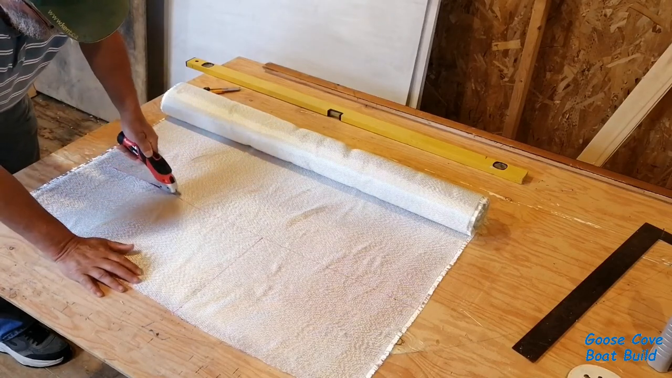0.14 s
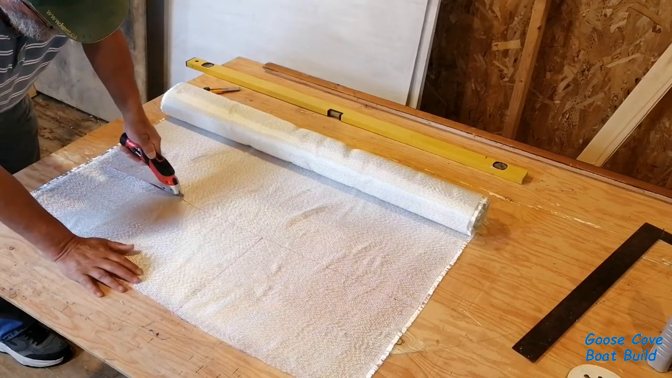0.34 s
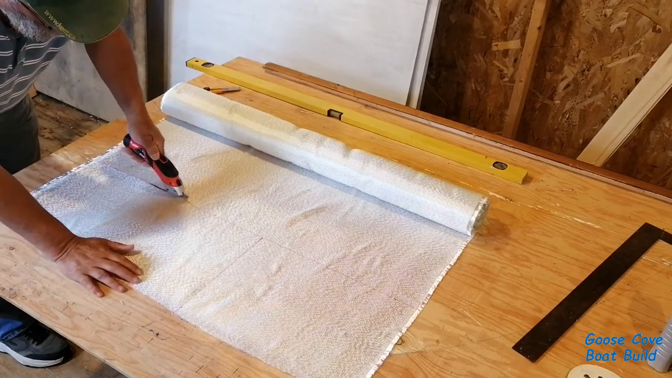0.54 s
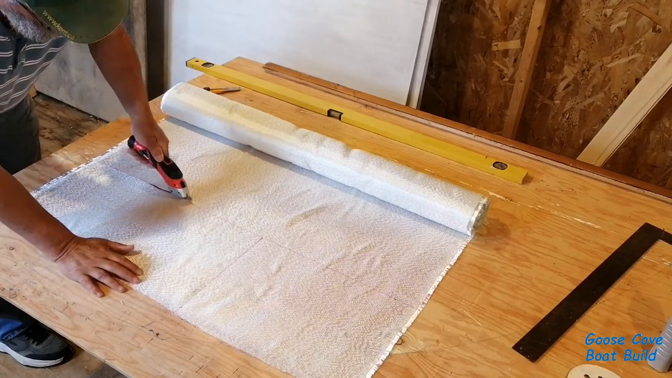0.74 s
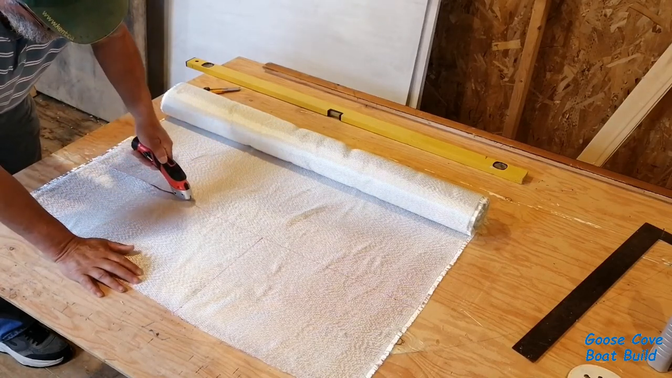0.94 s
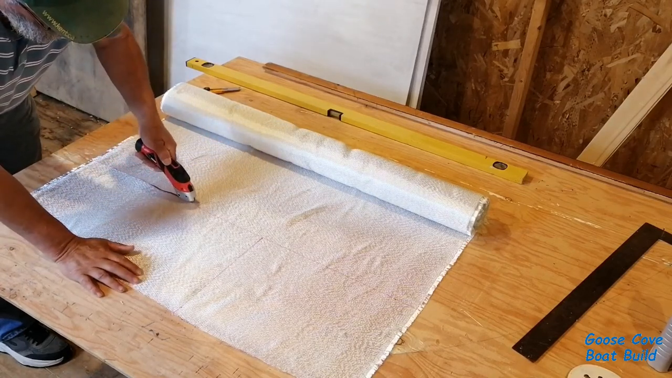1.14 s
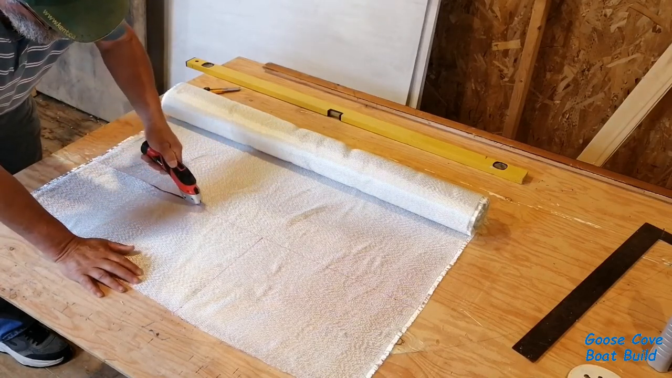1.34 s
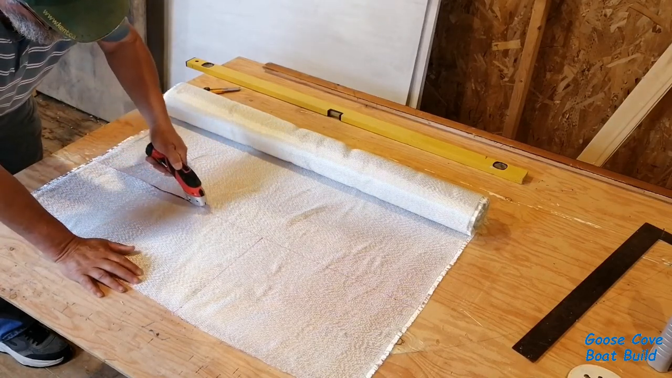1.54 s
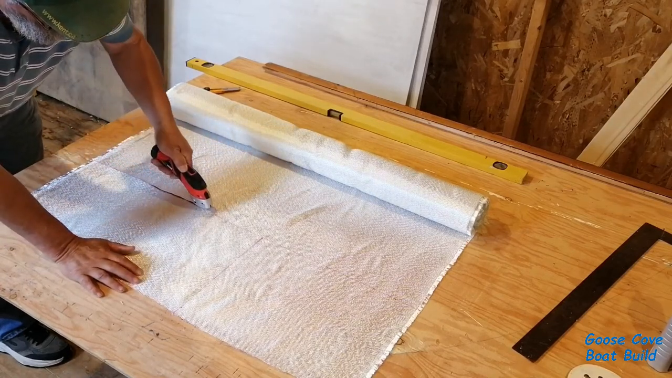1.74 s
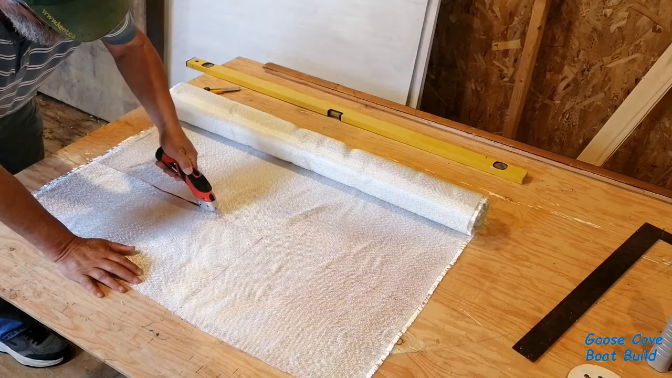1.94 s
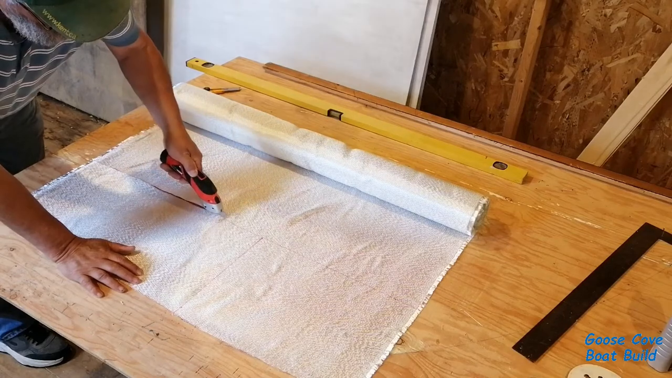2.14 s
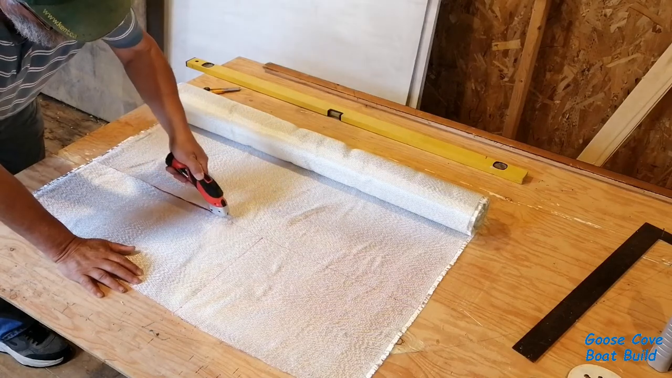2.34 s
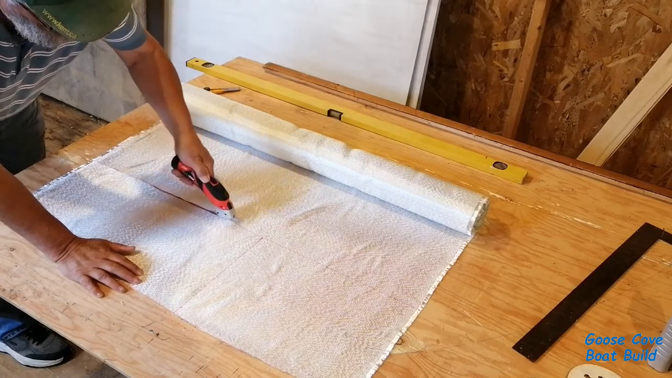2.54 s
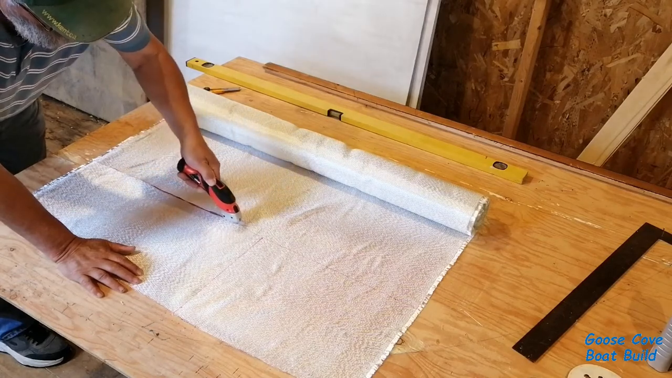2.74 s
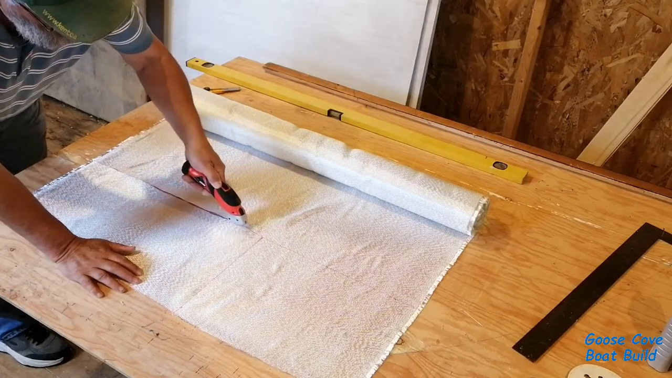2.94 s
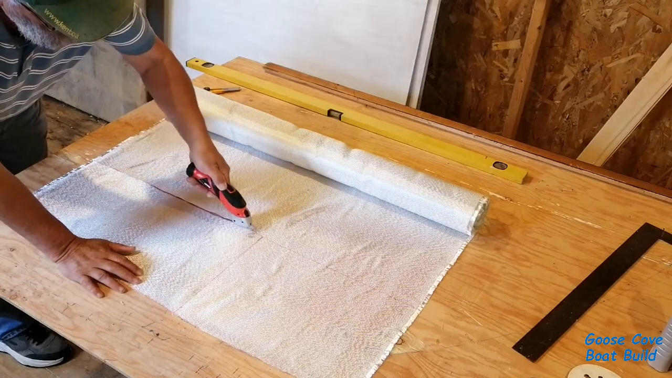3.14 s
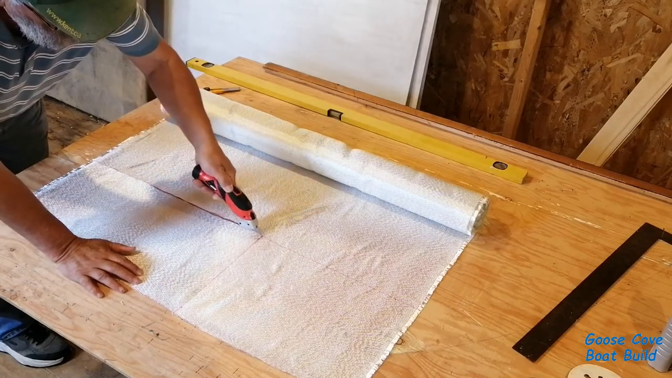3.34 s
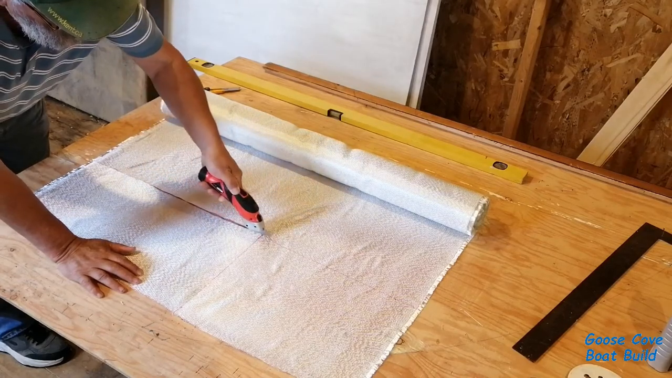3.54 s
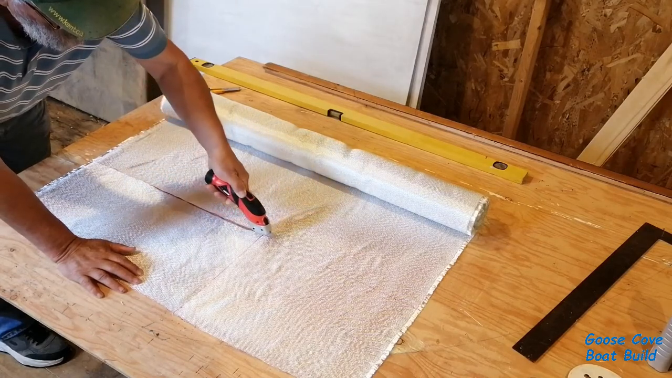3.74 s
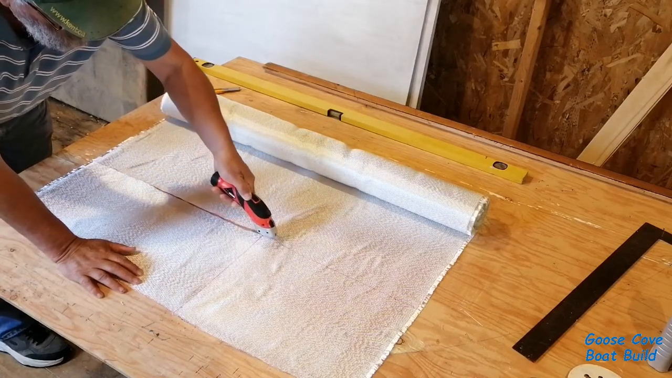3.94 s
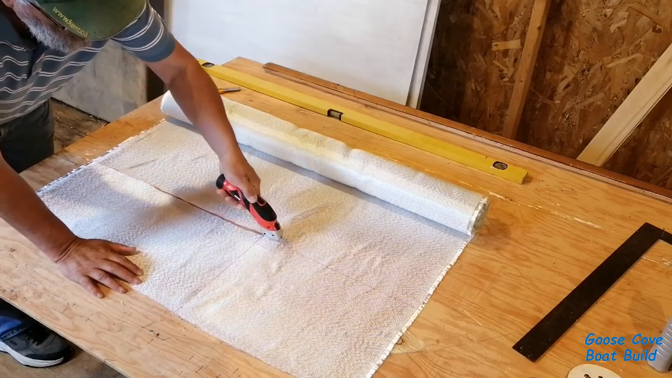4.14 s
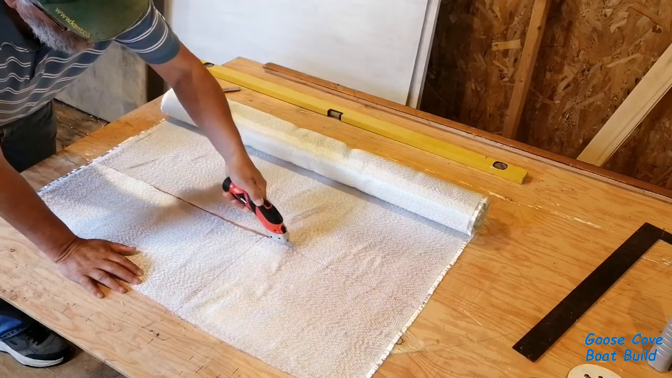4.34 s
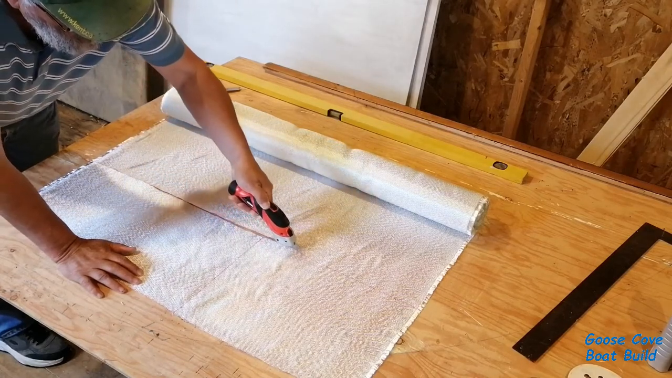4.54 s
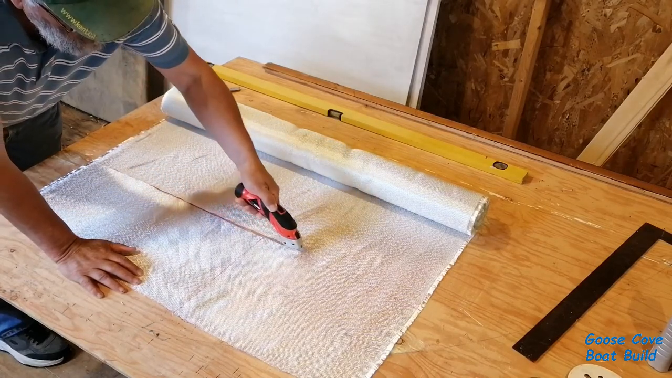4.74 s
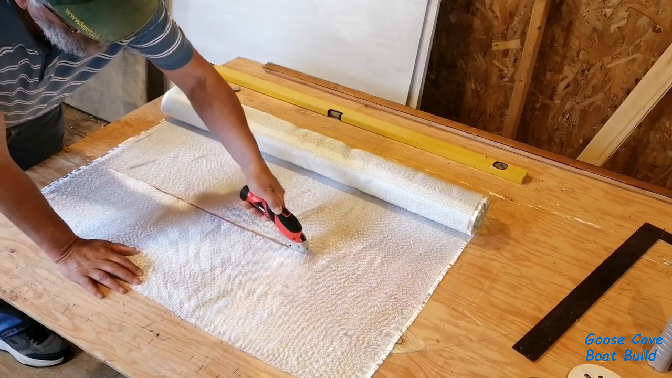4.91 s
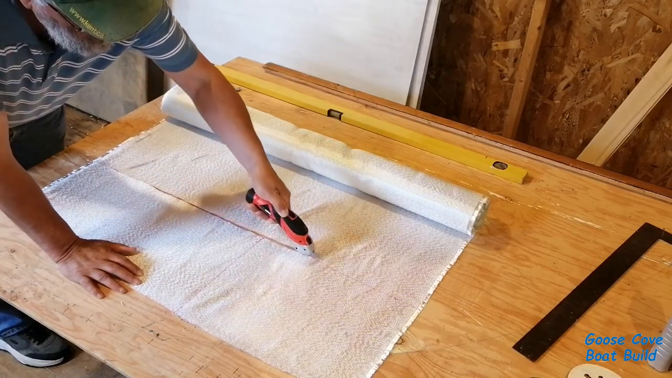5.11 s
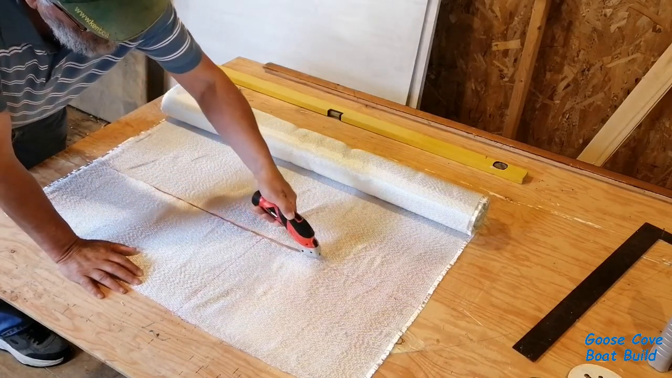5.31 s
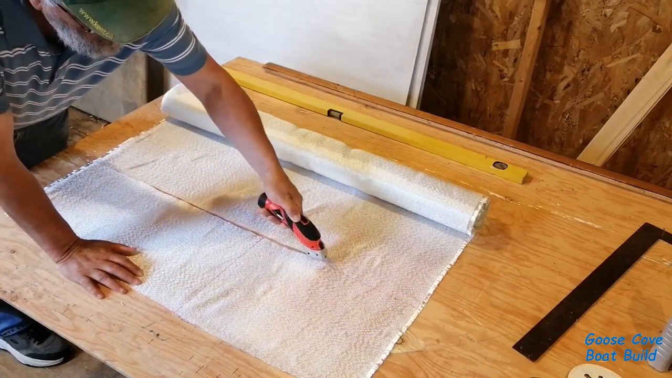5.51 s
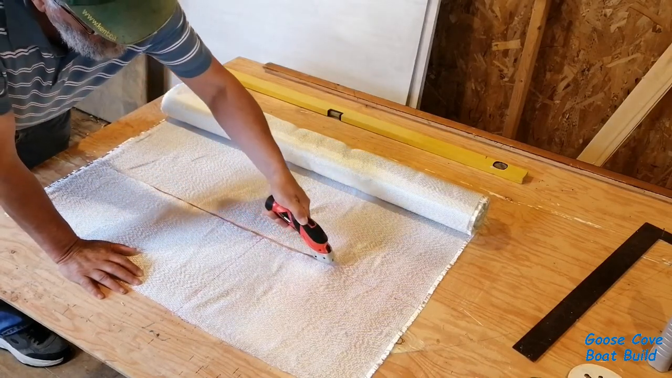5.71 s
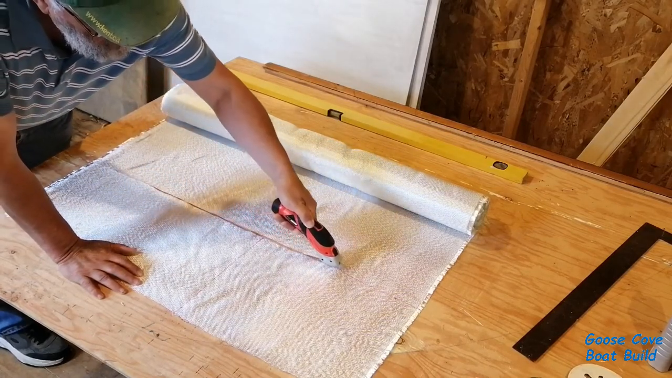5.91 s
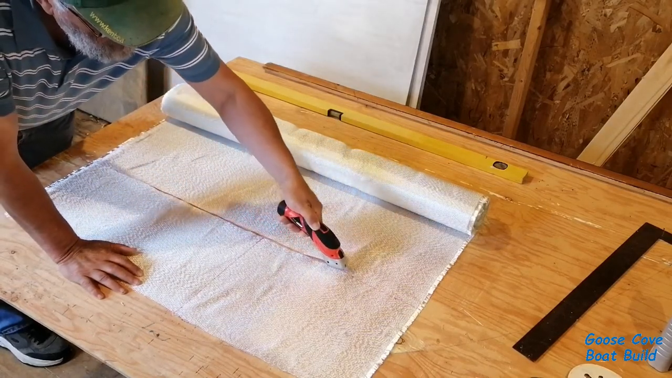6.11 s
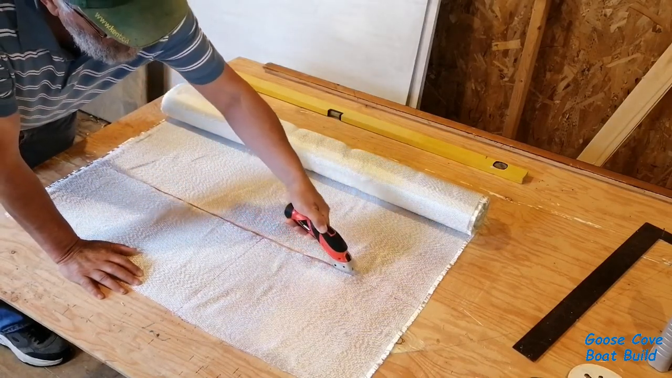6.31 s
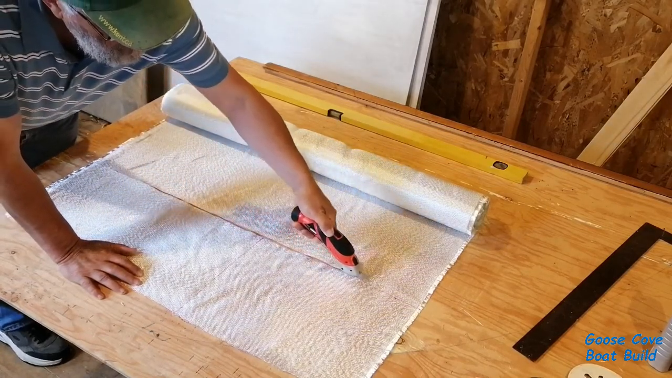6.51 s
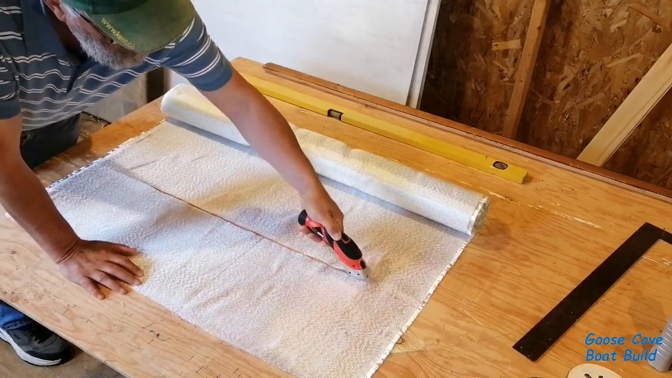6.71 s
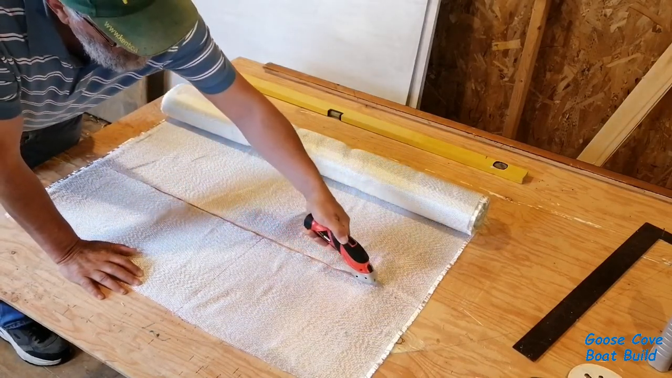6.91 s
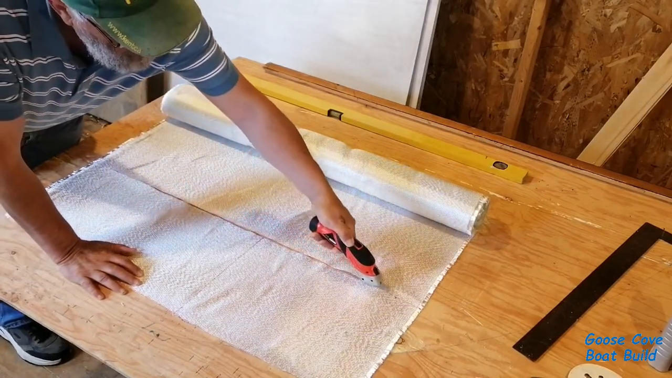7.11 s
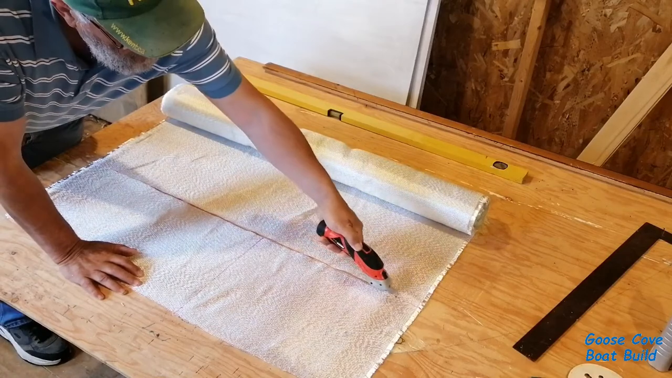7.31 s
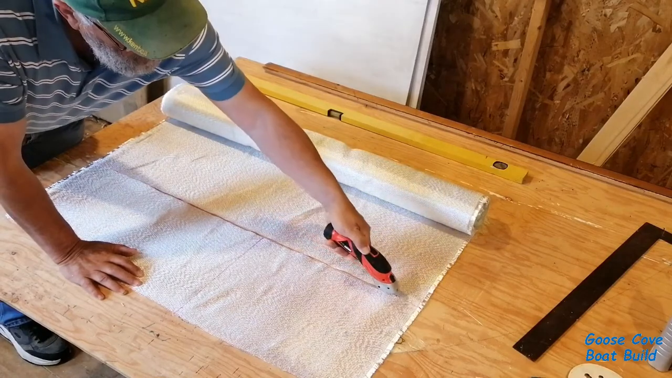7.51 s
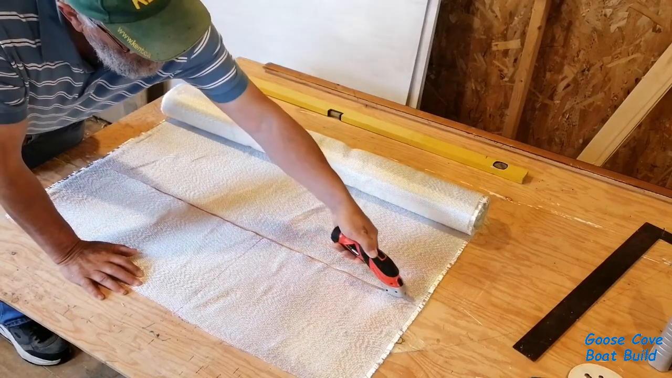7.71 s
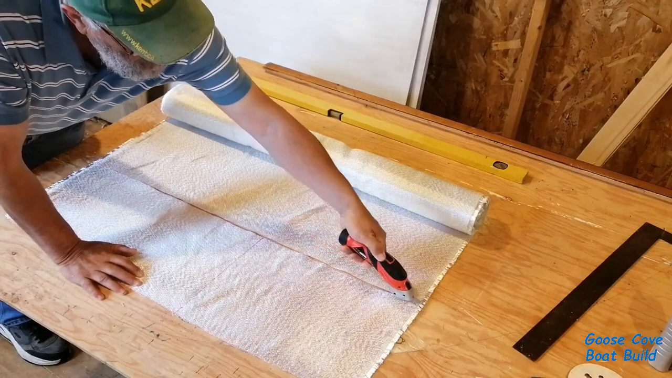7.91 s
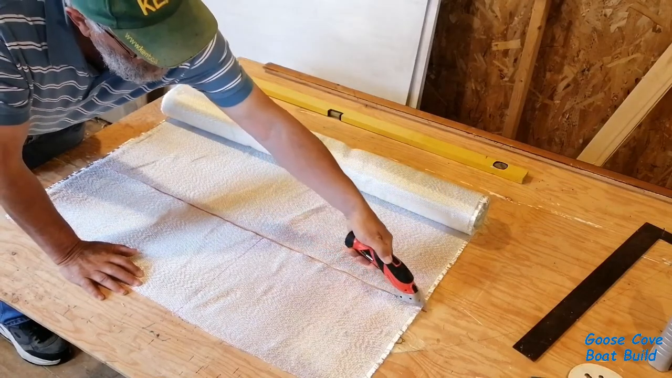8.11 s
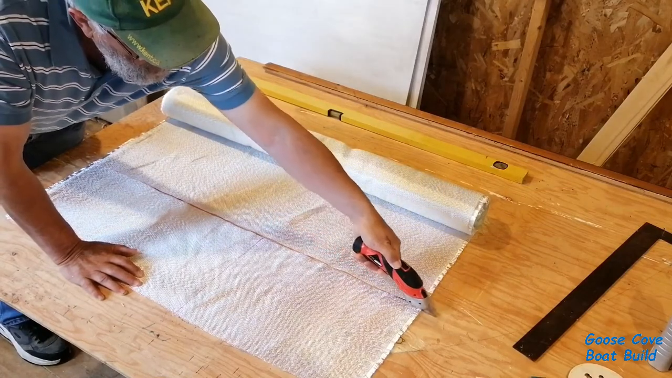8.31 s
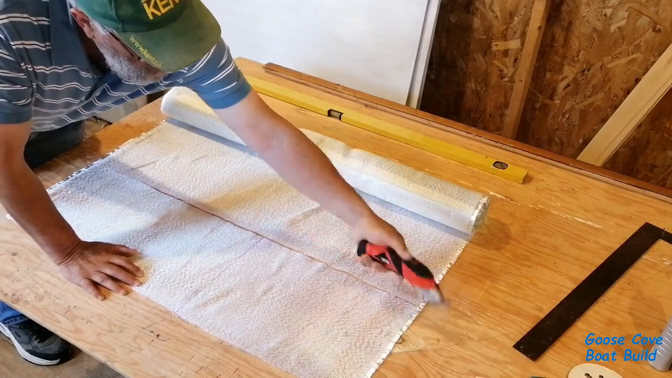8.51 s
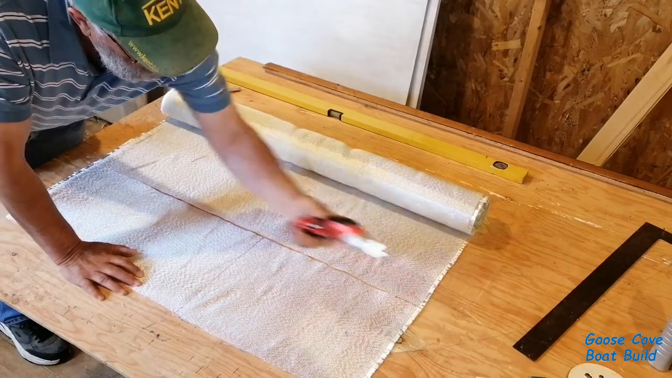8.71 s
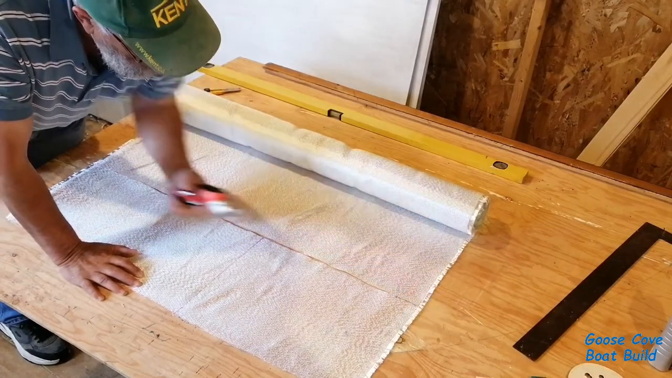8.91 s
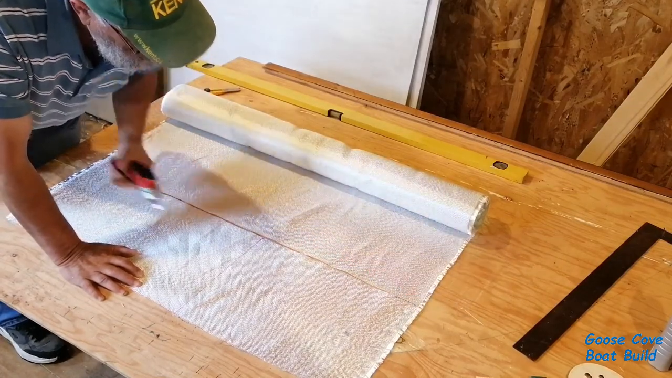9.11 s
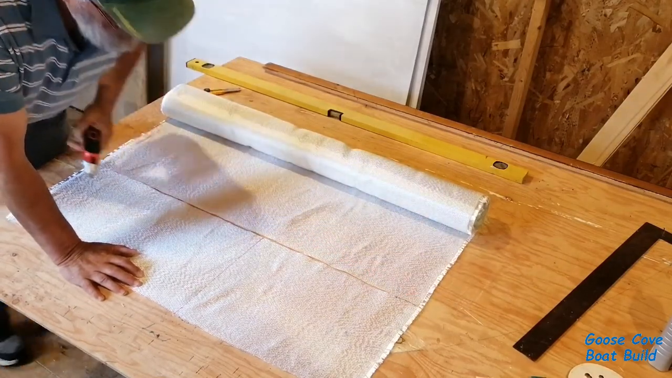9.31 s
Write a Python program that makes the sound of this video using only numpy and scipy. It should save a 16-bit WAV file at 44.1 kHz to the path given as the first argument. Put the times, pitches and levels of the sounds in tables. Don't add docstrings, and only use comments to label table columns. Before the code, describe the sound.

A handheld electric rotary cutter is already running, its low buzzing hum topped with many bright overtones and a grinding hiss. The tone shifts slightly and flutters as it crosses woven glass cloth on a plywood bench. Near eight and a half seconds it is switched off, rattling down within a quarter second. Soft scuffs and a cloth rustle follow. Close, mono, band-limited microphone sound with a short wooden shed echo.

```python
import sys
import numpy as np
from scipy import signal
from scipy.io import wavfile
from scipy.ndimage import uniform_filter1d

SR = 44100
rng = np.random.default_rng(int(sys.argv[2]) if len(sys.argv) > 2 else 0)


def generate_wav(sig):
    pcm = np.round(np.clip(np.atleast_2d(sig).T, -1, 1) * 32767).astype(np.int16)
    wavfile.write(sys.argv[1], SR, pcm)


def volts(x):
    e = np.asarray(x, float) / 20
    return 10 ** e


N = 412332
HOP, BINS = 128, 257
HZ = np.fft.rfftfreq(512, 1 / SR)
FRAME_S = np.arange(N // HOP + 5) * HOP / SR
OFF_S, BRAKE_S = 8.51, 8.74

# (time [s], boom of order 1 [dB])
BOOM_DB = [(0.0, -48.5), (0.02, -49), (0.68, -44.5), (0.87, -48.5), (1.44, -44.5), (3.74, -47.5),
           (4.99, -51), (5.09, -55.5), (5.28, -51.5), (6.13, -57.5), (6.63, -52), (6.84, -49), (7.95, -47),
           (8.24, -47.5), (8.4, -51), (8.5, -47)]


def evened(x):
    return x / np.sqrt(np.mean(abs(x) ** 2) + 1e-20)


def read(points, hz):
    f, value = np.transpose(points)
    return np.interp(np.log(hz + 1), np.log(f + 1), value)


def curve(rows, t):
    s, value = np.transpose(rows)
    return np.interp(t, s, value)


def bump(t, middle, length):
    return np.exp(-4 * ((t - middle) / length) ** 2)


def drift(shape, span):
    width = max(int(span), 1)
    once = uniform_filter1d(rng.standard_normal(shape), width, 0)
    return evened(uniform_filter1d(once, width, 0))


def noise(field_db):
    z = rng.standard_normal(field_db.shape) + 1j * rng.standard_normal(field_db.shape)
    return signal.istft((z * volts(field_db)).T, nperseg=512, noverlap=512 - HOP)[1][:N]


def shed(x):
    t60_s = .3
    t = np.arange(SR // 2) / SR
    taps = rng.choice([-1., 1.], len(t)) * (rng.random(len(t)) < .05)
    taps = taps * volts(-60 * t / t60_s) * (t > .006)
    return signal.fftconvolve(x, taps / np.linalg.norm(taps))[:N]


def shuffle():
    # (peak [s], rise [s], scuff level [dB], rustle level [dB])
    steps = [
        (9.015, 0.024, -72, -94),
        (9.08, 0.037, -74, -99),
        (9.175, 0.011, -71, -77),
        (9.22, 0.051, -58, -74),
        (9.296, 0.016, -62.5, -79),
    ]
    # (frequency [Hz], density [dB per Hz])
    thud = [(24, -27), (60, -2), (218, -14), (254, -20), (294, -28), (440, -16.5), (900, -43), (1170, -68),
            (1980, -120)]
    # (frequency [Hz], density [dB per Hz])
    cloth = [(300, -28), (600, -4.5), (1200, -7.5), (2000, -11.5), (3000, -13), (4200, -17), (5300, -17),
             (5800, -11), (6300, -21), (7000, -16), (7800, -28)]
    rise_db, scuff_fade_db_per_s, rustle_fade_db_per_s = 19, 253, 73
    rustle_slower = 2.4

    t = np.arange(N) / SR
    low, high = volts(-83.5), volts(-88)
    for peak_s, rise_s, low_db, high_db in steps:
        before_db = -rise_db * np.maximum(peak_s - t, 0) / rise_s
        after_s = np.maximum(t - peak_s, 0)
        low = np.maximum(low, volts(low_db + before_db - scuff_fade_db_per_s * after_s))
        high = np.maximum(high, volts(high_db + before_db / rustle_slower - rustle_fade_db_per_s * after_s))
    still = np.zeros((len(FRAME_S), 1))
    scuff = evened(noise(still + read(thud, HZ)))
    rustle = evened(noise(still + read(cloth, HZ)))
    return (low * scuff + high * rustle) * np.clip((t - 8.75) / 0.067, 0, 1)


def cutting():
    # (time [s], whine level [dB])
    effort = [(0, -47), (.95, -47), (1.4, -45), (1.8, -46), (2.0, -47), (2.5, -45.5), (3.2, -47),
              (3.7, -45), (4.8, -44), (6.1, -44), (6.5, -43.5), (8.3, -42.5)]
    # (middle [s], length [s], whine change [dB], treble change [dB])
    snags = [(.08, .08, -0.5, 0.5), (0.201, 0.059, 4.5, 1.5), (0.516, 0.02, -4.5, 4), (0.649, .06, -1, 1),
             (0.764, .07, 2.5, 2.5), (0.995, 0.12, -3.5, -1.5), (1.55, 0.055, 4, -1.5),
             (1.788, .05, 5.5, 5), (2.207, 0.05, 8, 6), (2.437, 0.018, -19, -3.5), (3.631, .05, 3, -4),
             (3.705, 0.03, 3, -0.5), (4.009, 0.085, -2.5, 1.5), (4.23, 0.045, 4.5, -1),
             (4.316, 0.091, -1, -0.5), (4.429, 0.013, -7, -2.5), (4.55, .06, 3.5, 0.5),
             (4.639, 0.12, -2.5, -3), (4.798, 0.061, 0.5, -1), (4.974, .04, 2, 1.5),
             (5.132, 0.079, -2, -0.5), (5.531, .03, -1, -2.5), (5.836, 0.033, -2.5, 2.5),
             (6.228, 0.058, -2.5, 4), (8.4, .3, -2, -1.5), (6.877, 0.043, 4.5, 5), (7.139, .05, 2.5, 1.5),
             (7.263, 0.087, 1, -1), (7.318, 0.032, -4.5, -4), (7.476, 0.078, -3, 0.5),
             (7.722, 0.041, -5, -0.5), (8.467, 0.12, 1, -1)]
    # (middle [s], length [s], level [dB])
    knocks = [
        (8.52, 0.021, 0.5),
        (8.569, 0.027, 0.5),
        (8.586, 0.017, -4.5),
        (8.615, 0.033, 2.5),
        (8.645, 0.022, -2.5),
        (8.665, 0.013, -2),
        (8.71, .02, 1.5),
        (8.737, 0.024, 2.5),
        (8.757, 0.018, 3),
    ]
    treble_follows, middle_follows = 0.97, 0.19
    snag_roughens = 0.2
    clear_s, clear_db = 8.3, 2.5
    rattle_db, coast_db_per_s, brake_db_per_s = 10.5, 97, 109
    dull_db_per_s, sharp_db_per_s, warm_db_per_s = 31, 24, 75

    effort_db = curve(effort, FRAME_S)
    snag_db = sum(db * bump(FRAME_S, s, length) for s, length, db, _ in snags)
    bright_db = sum(db * bump(FRAME_S, s, length) for s, length, _, db in snags)
    off_s = np.maximum(FRAME_S - OFF_S, 0)

    fall_db = rattle_db * np.minimum(off_s / 0.052, 1) - coast_db_per_s * off_s
    fall_db = fall_db - brake_db_per_s * np.maximum(FRAME_S - BRAKE_S, 0)
    fall_db = fall_db + sum(db * bump(FRAME_S, s, length) for s, length, db in knocks)

    treble_db = (treble_follows - 1) * effort_db + bright_db - snag_db
    treble_db = treble_db - dull_db_per_s * np.minimum(off_s, .14)
    treble_db = treble_db + sharp_db_per_s * np.clip(off_s - .15, 0, .12)
    middle_db = (middle_follows - 1) * (effort_db + snag_db) + warm_db_per_s * np.minimum(off_s, .06)
    clean_db = np.where(FRAME_S < clear_s, -snag_roughens * snag_db, clear_db * (FRAME_S < OFF_S))
    return effort_db + snag_db + fall_db, treble_db, middle_db, clean_db


def tilt(hz, treble_db, middle_db):
    top = np.clip((hz - 3900) / 600, 0, 1)
    middle = np.clip((1900 - hz) / 400, 0, 1) * np.clip((hz - 300) / 200, 0, 1)
    running = FRAME_S < 8.4
    treble = np.outer(treble_db - treble_db[running].mean(), top)
    return treble + np.outer(middle_db - middle_db[running].mean(), middle)


def grind(turns):
    # (frequency [Hz], density [dB per Hz])
    spectrum = [(30, -25), (100, -22), (160, 5), (260, -17), (450, -10), (900, -6), (1500, -3), (2300, 1),
                (3600, -1), (4300, -2.5), (5600, -1), (6900, -1.5), (7400, -4), (7800, -29.5)]
    grind_db, pulse_depth = -5.5, 0.23

    level_db, treble_db, middle_db, clean_db = cutting()
    patches = evened(uniform_filter1d(drift((len(FRAME_S), BINS), 9.2), 6, 1))
    patches = patches * np.where(FRAME_S < OFF_S, 1, .3)[:, None]
    shape_db = read(spectrum, HZ)
    field_db = shape_db + 1.7 * patches + drift(len(FRAME_S), 4.4)[:, None]
    field_db = field_db + tilt(HZ, treble_db, middle_db)
    band = (HZ > 1700) & (HZ < 4200)
    unit = np.std(noise(np.where(band, shape_db, -200) + 0 * field_db))

    boom_db = 0.59 * curve(BOOM_DB, FRAME_S) - 16.7 - 120 * np.maximum(FRAME_S - 8.58, 0)
    bench = np.clip((480 - HZ) / 200, 0, 1)
    drive_db = np.outer(level_db - clean_db, 1 - bench) + np.outer(boom_db, bench)
    hiss = noise(field_db + grind_db + drive_db) / unit
    teeth = signal.lfilter(*signal.butter(2, 700, "high", fs=SR), hiss)
    moving = np.arange(N) < BRAKE_S * SR
    return hiss + pulse_depth * moving * teeth * np.cos(2 * np.pi * turns)


def whine(turns):
    # (order, level [dB])
    at_start = [(1, 0), (2, -8), (3, -11), (4, -16), (5, -11), (6, -16), (7, -6), (8, -14.5), (9, -11.5),
                (10, -10), (11, -7.5), (12, -13.5), (13, -14), (14, -11), (15, -17.5), (16, -13.5),
                (17, -13), (18, -16), (19, -16), (20, -9), (21, -13), (22, -16.5), (23, -17.5), (24, -27)]
    at_near = [(1, 0), (2, -9), (3, -9.5), (4, -20), (5, -13), (6, -10.5), (7, -7), (8, -13.5), (9, -11.5),
               (10, -9.5), (11, -10), (12, -13.5), (13, -12.5), (14, -9), (15, -11.5), (16, -13.5),
               (17, -11.5), (18, -12), (19, -9), (20, -14.5), (21, -10), (22, -12), (23, -17), (24, -31)]
    at_midway = [(1, 0), (2, -2), (3, -8), (4, -7), (5, -14), (6, -16.5), (7, -4), (8, -10.5), (9, -10.5),
                 (10, -6), (11, -8), (12, -8.5), (13, -7), (14, -9), (15, -9.5), (16, -8.5), (17, -7),
                 (18, -8), (19, -6), (20, -10), (21, -7.5), (22, -9), (23, -11.5), (24, -12)]
    at_far = [(1, 0), (2, -7), (3, -8), (4, -6), (5, -11.5), (6, -11.5), (7, -12), (8, -10.5), (9, -11),
              (10, -9.5), (11, -13), (12, -6), (13, -9), (14, -8), (15, -9), (16, -10.5), (17, -8),
              (18, -8), (19, -11.5), (20, -7.5), (21, -15), (22, -12), (23, -8), (24, -17.5)]
    at_edge = [(1, 0), (2, -17), (3, -11.5), (4, -17), (5, -4.5), (6, -9), (7, -13), (8, -12), (9, -12.5),
               (10, -17), (11, -16.5), (12, -4.5), (13, -9), (14, -14), (15, -11.5), (16, -7), (17, -7),
               (18, -8.5), (19, -7), (20, -9.5), (21, -11), (22, -13), (23, -12), (24, -22)]
    places_s = [1.25, 1.45, 2.4, 3.0, 6.0, 6.4, 7.6, 8.2]
    # (frequency [Hz], level [dB])
    upper = [(4200, -16), (5500, -12), (6300, -16.5), (6900, -13), (7400, -22.5), (7800, -38)]
    # (order, level [dB])
    housing = [
        (2, -52.5),
        (4, -60.5),
        (7, -56),
    ]
    # (order, middle [s], length [s], level [dB])
    spots = [(2, 4.05, 1.5, 5), (2, 8.05, 1.6, -11.5), (4, 1.6, 0.15, -11), (4, 2.5, 0.64, -5.5),
             (4, 3.4, 0.64, -7), (4, 3.6, 0.63, 8.5), (4, 6.215, 1.93, 9), (3, 8.4, 0.3, -3.5),
             (7, 0.12, 0.83, 7), (7, 1.75, 1.1, 6.5), (7, 2.2, 0.062, 4.5), (7, 4.03, 0.87, 7.5),
             (7, 5.7, 2.5, -3), (7, 7.87, 1.0, -6.5), (7, 8.5, 0.19, -11), (3, 4.24, 0.29, -12),
             (11, 1.22, 0.56, 5.5), (12, 6.45, 0.096, 11.5), (13, 5.2, 1.6, 2.5), (18, 7.77, 0.81, 4),
             (1, 8.556, 0.017, -17), (1, 8.67, 0.1, -24), (3, 6.27, 0.95, -12), (5, 5.05, 2.4, 3.5),
               (8, 3.56, 0.5, 6.5), (8, 5.53, 0.54, 4.5), (8, 6.16, 0.8, -7), (8, 7.15, 0.58, 5.5),
               (9, 0.16, 0.26, -7), (9, 3.1, 0.89, 8), (10, 5.95, 1, -4.5), (11, 7.5, 0.27, 9),
               (32, 4.4, 1.8, 4), (13, 1.4, 0.5, 6), (14, 2.8, 0.87, -11.5), (14, 5.52, 0.54, 3),
               (14, 7.7, 0.37, 10.5), (24, 1.7, 1.1, 3.5), (16, 8.45, 0.25, 3.5), (17, 5.15, 0.3, -14),
               (17, 7.4, 0.38, -9.5), (18, 0.1, 0.25, -6), (18, 0.75, 0.5, 1), (24, 8.25, 0.5, 5.5),
               (37, 6.85, 0.2, 8), (21, 0.95, 0.43, 7.5), (21, 1.55, 0.32, -8), (23, 1.55, 0.28, 6),
               (9, 7.25, 0.2, 7.5), (24, 0.98, 0.5, 13.5)]
    # (order, middle [s], length [s], level [dB])
    moving = [(3, 1.7, 0.7, -8.5), (3, 4.56, 0.25, -4.5), (4, 3.4, 0.72, -2.5), (4, 4.55, 0.52, 7.5),
              (5, 1.06, 0.61, -4), (5, 7.98, 0.62, -9.5), (6, 4.84, 0.32, 9.5), (8, 7.86, 0.11, -2),
              (9, 8.6, 0.15, 8), (10, 3.11, 0.24, 5.5), (10, 4.24, 0.98, -3.5), (11, 2.5, 0.13, -10),
              (11, 4.88, 0.64, -3), (11, 6.0, 0.3, 1), (12, 1.59, 0.51, 4), (12, 9.6, 0.15, -13),
              (16, 2.2, 0.23, 8.5), (13, 6.53, 0.41, 6), (13, 6.5, 0.34, -6), (13, 8.29, 0.23, -4.5),
              (14, 3.62, 0.15, 5), (14, 4.78, 0.23, -9), (15, 7.85, 0.4, -11), (16, 6.25, 0.35, 5),
              (15, 6.83, 0.22, -15), (16, 1.6, 0.34, 3.5), (16, 4.88, 0.53, -7.5), (16, 4.3, 0.15, -6),
              (16, 5.7, 0.57, -5), (16, 8.15, 0.33, -7), (17, 4.75, 0.15, 9.5), (18, 1.9, 0.17, -5),
              (18, 6.81, 0.14, 9), (19, 2.41, 0.29, 1.5), (19, 3.1, 0.24, -12.5), (19, 4.46, 1.2, -4.5),
              (19, 6.33, 0.16, 7), (19, 8.35, 0.7, -6), (20, 1.2, 0.29, -5.5), (20, 4.5, 1.2, 4),
              (20, 7.5, 1.1, -9.5), (21, 5.25, 1.6, -5), (21, 7.45, 1.6, 4), (13, 5.9, 0.12, 6),
              (13, 0.16, 0.2, 8), (23, 4.354, 0.44, -11), (23, 7.6, 1.5, -9), (24, 5.55, 0.74, -8)]
    # (order, middle [s], length [s], level [dB])
    swells = [(7, 6.69, 1.4, -2), (9, 4.88, 0.18, 8), (9, 7.9, 0.18, 7), (12, 2.57, 0.38, 0.5),
              (32, 1.5, 0.6, -5.5), (12, 7.35, 0.49, 6.5), (28, 1.7, 1.8, -5.5), (13, 6.57, 0.41, 8),
              (14, 7.69, 0.53, -8.5), (14, 8.42, 0.28, 12.5), (15, 1.1, 1.2, 3), (15, 4.58, 0.28, -6),
              (17, 4.77, 0.45, -5.5), (17, 7.44, 0.19, 10.5), (17, 8.12, 0.25, -8.5),
              (18, 1.57, 0.28, -12.0), (20, 2.47, 0.71, 4.5), (21, 6.7, 0.6, 4), (28, 7.95, 0.35, -6.0),
              (22, 5.25, 0.15, 7), (23, 4.56, 0.31, 8.5), (25, 0.79, 1.2, -10.5), (25, 5.95, 0.41, 9),
              (27, 1, 0.52, -5.5), (27, 9, 0.3, 14.0), (27, 8.42, 0.2, 7.5), (28, 8.4, 0.17, -10),
              (28, 8, 0.35, 9.5), (29, 0.57, 0.64, -4.5), (29, 2.41, 0.7, -7), (29, 5.52, 0.55, -16),
              (30, 1.3, 0.83, -8), (30, 8.01, 0.2, 11), (32, 0.55, 0.7, 5), (32, 8.06, 0.7, 5),
              (33, 5.56, 0.7, 7.5), (34, 0.12, 0.31, 6), (35, 5.1, 0.35, 10), (36, 0.19, 0.21, -21),
              (36, 2, 0.15, 6), (36, 6.8, 0.77, -13), (38, 2.76, 0.7, 5.5), (39, 8.22, 0.28, 9.5),
              (40, 7.78, 0.25, 10.5)]
    whine_db, play_rad = -.6, .0085

    level_db, treble_db, middle_db, clean_db = cutting()
    k = np.arange(1, 44)
    places = [at_start, at_near, at_near, at_midway, at_midway, at_far, at_far, at_edge]
    place_db = np.array(places)[:, :, 1]
    low = np.array([np.interp(FRAME_S, places_s, order_db) for order_db in place_db.T]).T
    db = np.hstack([low, np.tile(read(upper, 180 * k[24:]), (len(low), 1))])
    db = db - 10 * np.log10(volts(2 * db[:, 9:23]).sum(1))[:, None]
    db = db + (level_db + clean_db + whine_db)[:, None] + tilt(180 * k, treble_db, middle_db)
    db = db + 1.18 * drift(db.shape, 45)
    db[:, 0] = curve(BOOM_DB, FRAME_S) + 2.1
    for order, steady_db in housing:
        db[:, round(order) - 1] = steady_db
    for order, middle_s, length_s, spot_db in spots + moving + swells:
        db[:, round(order) - 1] += spot_db * bump(FRAME_S, middle_s, length_s)

    ringing = np.clip((db - uniform_filter1d(db, 5, 1)) / 8, 0, .8)
    db = db + 1.9 * drift(db.shape, 7) * np.minimum(k / 5, 1) * (1 - ringing)
    off_s = np.maximum(FRAME_S - OFF_S, 0)[:, None]
    db = db - off_s * np.where(k == 1, 70, 500)

    blur_rad = play_rad * k * (1 - ringing) + 40 * off_s * np.clip(k / 4, 0, 1) ** 2
    wobble = rng.uniform(0, 2 * np.pi, len(k)) + blur_rad * drift(db.shape, 6.5)
    wobble = wobble + 0.03 * np.outer(drift(len(db), 5.3), k)
    wobble = wobble + 1.2 * drift(db.shape, 150) * (k > 2)
    t = np.arange(N) / SR
    total = np.zeros(N)
    for j, order in enumerate(k):
        level = np.sqrt(2) * np.interp(t, FRAME_S, volts(db[:, j]))
        total += level * np.cos(2 * np.pi * order * turns + np.interp(t, FRAME_S, wobble[:, j]))
    return total


def shaft_turns():
    # (time [s], speed [Hz])
    speed = [(0.0, 181.6), (0.71, 181.5), (0.87, 183.7), (1.47, 181.7), (2.18, 180.2), (2.32, 181.5),
             (3.17, 179.9), (3.31, 180.9), (4.9, 179.1), (4.97, 180.5), (6.27, 179.2), (6.34, 178.5),
             (6.63, 178.5), (6.79, 176.6), (7.81, 176.8), (7.9, 174.2), (8.38, 178.3), (8.5, 179)]
    # (middle [s], length [s], speed change [Hz])
    tugs = [(0.51, 0.066, 0.61), (0.662, 0.17, -1.15), (1.066, 0.16, -0.58), (1.405, 0.44, -0.83),
            (2.295, 0.29, 0.5), (2.719, 0.46, -0.19), (3.191, 0.15, -0.91), (3.401, 0.094, 0.65),
            (3.583, 0.16, -1.34), (4.33, 0.17, 0.51), (4.727, 0.3, 0.78), (4.849, 0.057, 0.71),
            (5.238, 0.089, -1), (6.16, 0.06, 0.705), (6.88, 0.19, -0.66), (7.199, 0.3, 0.6),
            (7.458, 0.098, -0.79), (7.883, 0.06, -0.796), (8.026, 0.1, 0.79), (8.359, 0.16, 0.84)]
    coast_s = .2

    t = np.arange(N) / SR
    tug_hz = sum(change * bump(FRAME_S, s, length) for s, length, change in tugs)
    shaft_hz = curve(speed, t) + np.interp(t, FRAME_S, tug_hz)
    return np.cumsum(shaft_hz * np.exp(-np.maximum(t - OFF_S, 0) / coast_s)) / SR


def scene():
    shed_db = -17
    turns = shaft_turns()
    tool = grind(turns) + whine(turns)
    return np.tile(tool + volts(shed_db) * shed(tool) + shuffle(), (2, 1))


def voice_link(x):
    # (middle [s], length [s], drop of the weak parts [dB])
    starved = [(.079, .072, -27), (.202, .08, -21), (.811, .095, -20), (1.215, .035, -19),
               (1.472, .035, -22), (1.726, .035, -15), (2.047, .05, -10), (2.226, .047, -15),
               (2.311, .022, -15), (2.496, .027, -18), (2.583, .045, -9), (2.937, .042, -17),
               (3.33, .075, -24), (3.425, .04, -12), (3.51, .025, -9), (3.715, .025, -9), (4.052, .042, -8),
               (4.234, .037, -20), (4.34, .065, -21), (4.513, .082, -25), (4.755, .057, -18),
               (4.884, .08, -17), (4.97, .03, -9), (5.283, .04, -11), (5.502, .065, -20), (5.754, .06, -23),
               (5.85, .06, -20), (5.94, .035, -14), (6.215, .09, -21), (6.393, .035, -22),
               (6.718, .037, -18), (6.886, .042, -17), (7.1, .06, -24), (7.303, .035, -12),
               (8.37, .042, -18),
               (8.562, 0.021, -12),
        (8.62, 0.022, -8),
        (8.728, 0.025, -12),
    ]
    short_per_s, short_s, short_db = 4, .017, -7

    size, hop = 1408, 176
    hz, t, z = signal.stft(x, SR, nperseg=size, noverlap=size - hop)
    brief = [(s, short_s, short_db) for s in rng.uniform(0, OFF_S, round(short_per_s * OFF_S))]
    middle_s, length_s, drop_db = np.transpose(starved + brief)[:, :, None]
    gate = np.clip((length_s / 2 + .003 - abs(t - middle_s)) / .003, 0, 1)
    depth_db = -5.0 + (1.8 * drop_db * gate).min(0)
    power = uniform_filter1d(abs(z) ** 2, 5, 1)
    patchy_db = 1.2 + 2.6 * evened(uniform_filter1d(drift(z.shape, 8), 8, 1))
    lenient_db = -4 * np.clip((1500 - hz) / 600, 0, 1)[:, None]
    threshold = volts(2 * (patchy_db + lenient_db)) * uniform_filter1d(power, 40, 0)
    bass_spared = np.clip((hz - 200) / 1100, .25, 1)[:, None]
    z = z * np.where(power < threshold, volts(bass_spared * depth_db), 1)
    return signal.istft(z, SR, nperseg=size, noverlap=size - hop)[1][:N]


def top_cut(x):
    return signal.sosfilt(signal.butter(12, 15700, fs=SR, output="sos"), x)


def record(dry):
    hiss_db = -101
    kept = voice_link(dry[0])
    low_pass = signal.firwin(801, 7840, window=("kaiser", 10), fs=SR)
    kept = signal.oaconvolve(kept, low_pass, "same")
    kept = signal.lfilter(*signal.butter(1, 120, "high", fs=SR), kept)
    top_band = signal.firwin(201, [10200, 15600], pass_zero=False, fs=SR)
    hiss = evened(signal.oaconvolve(rng.standard_normal(N), top_band, "same"))
    kept = kept + volts(hiss_db) * hiss * np.clip((8.9 - np.arange(N) / SR) / 0.14, .3, 1)
    return top_cut(np.tile(kept, (2, 1)))


dry = scene()
out = record(dry)
generate_wav(out)
```